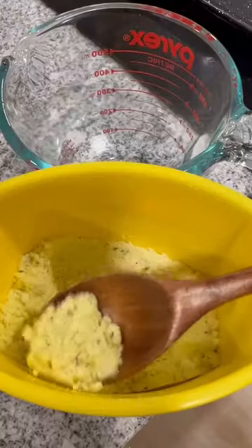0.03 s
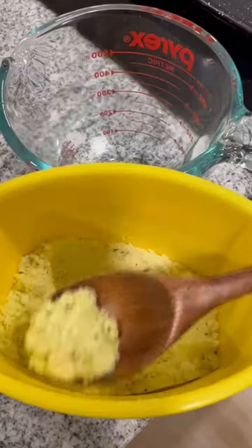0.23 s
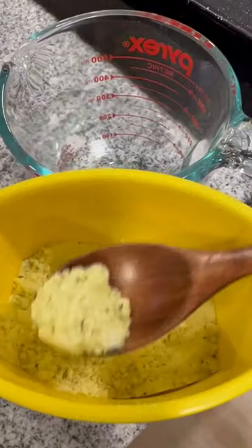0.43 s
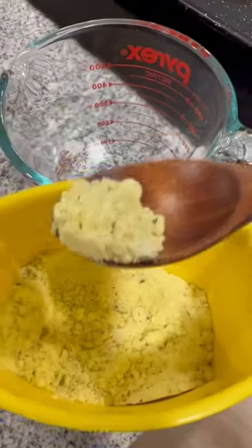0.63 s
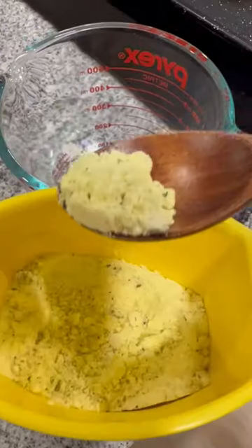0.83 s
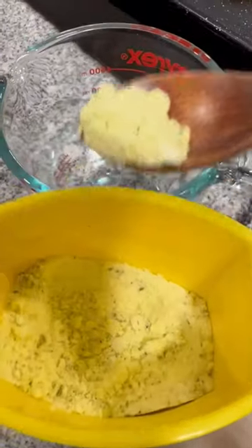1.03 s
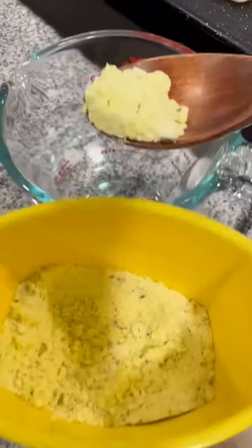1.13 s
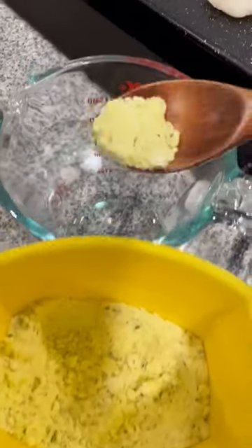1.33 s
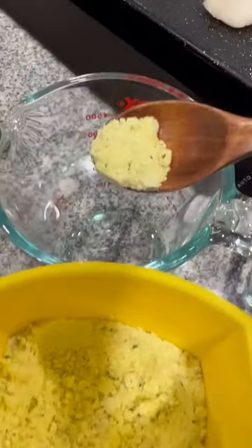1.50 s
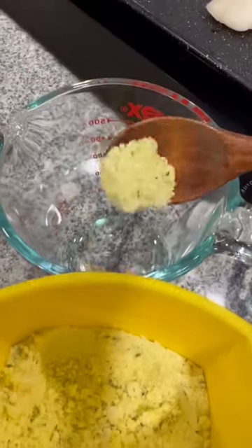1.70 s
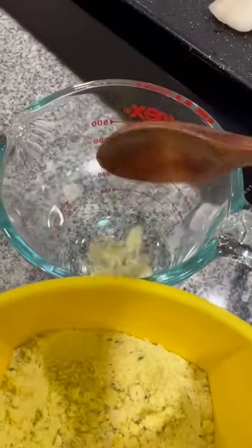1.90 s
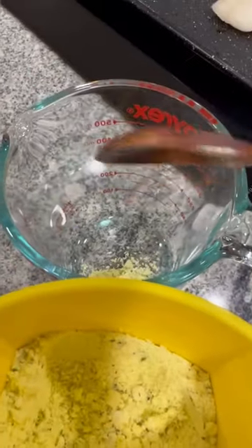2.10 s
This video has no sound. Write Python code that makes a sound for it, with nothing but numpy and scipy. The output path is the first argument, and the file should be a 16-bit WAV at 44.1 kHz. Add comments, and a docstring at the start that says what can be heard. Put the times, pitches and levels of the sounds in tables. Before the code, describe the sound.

A wooden spoon knocks twice on a plastic bowl, then powder slides faintly into glass.

```python
"""A wooden spoon heaped with soft powder is tapped twice on a plastic mixing bowl, close up. Each tap
is a crack and a dull knock of damped modes, and the powder shifts and spills in a rustle of tiny impacts.
The spoonful then slides into a glass jug, a grainy hiss coloured by the jug's resonances, and the last
crumbs ring the glass faintly. Underneath, an appliance hums in the small kitchen."""
import sys
import numpy as np
from scipy import signal
from scipy.fft import rfft, irfft, next_fast_len
from scipy.io import wavfile
from scipy.ndimage import map_coordinates

SR = 44100
rng = np.random.default_rng(int(sys.argv[2]) if len(sys.argv) > 2 else 0)


def pcm_store(signal):
    """Save signal as 16-bit PCM."""
    levels = np.round(np.clip(np.atleast_2d(signal), -1, 1) * 32767)
    wavfile.write(sys.argv[1], SR, levels.astype(np.int16).T)


N = 94815
T = np.arange(N) / SR
SIZE = next_fast_len(N + SR // 2)
HZ = np.fft.rfftfreq(SIZE, 1 / SR)

# stereo width of the close sounds (frequency [Hz], side minus mid [dB])
CLOSE_WIDTH = [(1000, -3), (3000, -20.5), (5000, -13), (7500, -3), (14000, -5.5)]
# tone of powder landing on glass (frequency [Hz], level [dB])
POWDER_ON_GLASS = [(800, -53), (2200, -18), (2900, -17), (3700, -13), (5800, -12.5), (7700, -0.5),
                   (9600, -2), (11500, -10), (13000, -7), (15300, -4)]


def amp(db):
    """Decibels to gain."""
    return 10 ** (np.asarray(db) / 20)


def unit(x):
    """Scale to rms 1."""
    return x / np.sqrt(np.mean(x ** 2) + 1e-20)


def along(points, hz=HZ):
    """Read a curve of (Hz, value) points on a log frequency axis."""
    freqs, values = np.transpose(points)
    return np.interp(np.log(hz + 1), np.log(freqs + 1), values)


def filtered(x, gain):
    """Apply a frequency response."""
    return irfft(rfft(x, SIZE) * gain, SIZE)[..., :N]


def fade(t, t60):
    """Hold at 1 until t = 0, then fall 60 dB every t60 seconds."""
    return 1000 ** (-np.maximum(t, 0) / t60)


def puff(peak_s, rise, fall):
    """A swell that climbs its last 20 dB in rise seconds, then drops 20 dB every fall seconds."""
    return 10 ** -np.where(T < peak_s, ((peak_s - T) / rise) ** 2, (T - peak_s) / fall)


def wobble(rate):
    """A smooth random curve with rate knots a second."""
    return map_coordinates(rng.standard_normal(int(N * rate / SR) + 4), [T * rate])


def noise():
    """Two independent white noises."""
    return rng.standard_normal((2, N))


def stereo(pair, gain, width=CLOSE_WIDTH):
    """Colour two signals and spread them as mid and side, at rms 1."""
    mid, side = filtered(pair, gain * np.array([np.ones_like(HZ), amp(along(width))]))
    return unit(np.array([mid + side, mid - side]))


def grains(per_s=2000, spread_db=4.5, dust_share=0.26):
    """Powder texture: dense tiny impacts of uneven size over a smooth hiss of dust."""
    hits = (rng.random((2, N)) < per_s / SR) * np.sign(noise())
    hits *= amp(spread_db * noise())
    return np.sqrt(1 - dust_share) * unit(hits) + np.sqrt(dust_share) * noise()


def kitchen_air(level_db=-57, swell_db=2, rumble_hz=140):
    """Room tone: a low rush of air whose rumble gently swells."""
    # tone of the air (frequency [Hz], relative level [dB])
    colour = [(18, -37.5), (30, -2.5), (90, 0.5), (135, -4.5), (185, -11.5), (300, -8.5), (380, -15),
              (500, -15), (640, -23), (1000, -28.5), (1300, -30), (1900, -38.5), (2230, -34), (2550, -44),
              (3100, -49), (5500, -50), (6600, -48.5), (9000, -53), (12500, -62.5), (15000, -78)]
    # its stereo width (frequency [Hz], side minus mid [dB])
    width = [(30, -37.5), (90, -23.5), (180, -13.5), (350, -8.5), (700, 4), (1500, -8), (4000, -3.5),
             (10000, 0)]
    air = amp(level_db) * stereo(noise(), amp(along(colour)), width)
    rumble = filtered(air, HZ < rumble_hz)
    return air + (amp(swell_db * wobble(8)) - 1) * rumble


def appliance(drift_hz=1.446, waver_db=1):
    """An appliance hums and whines, each partial slightly unsteady in pitch and level."""
    # low hum partials (frequency [Hz], rms level [dB])
    hum = [(97, -69), (158, -73), (219.8, -63), (276, -76.5), (317, -65), (438, -76.5), (518, -69.5),
           (631, -77.5), (1106, -89), (1264, -85.5)]
    # faint high whines (frequency [Hz], rms level [dB])
    whine = [(4850, -106), (6480, -101), (6740, -103), (8290, -102), (9490, -103)]
    out = np.zeros(N)
    for hz, db in hum + whine:
        cycles = np.cumsum(hz + drift_hz * wobble(9.76)) / SR + rng.random()
        out += np.sqrt(2) * amp(db + waver_db * wobble(6.73)) * np.sin(2 * np.pi * cycles)
    return out


def room_tail(level_db=-58, centre_hz=950, width_hz=390, t60=0.58):
    """A faint band of noise, the room's tail of an earlier tap, dies away at the start."""
    band = 1 / (1 + (2 * (HZ - centre_hz) / width_hz) ** 2)
    return amp(level_db) * fade(T, t60) * stereo(noise(), band)


def powder_shifts():
    """The powder rustles as the spoon swings and jumps when it lands."""
    # rustles in the spoon and bowl (peak time [s], level [dB], rise [s], fall [s])
    shifts = [(.002, -73.5, 0.0088, 0.06), (.061, -62.5, 0.018, .04), (0.073, -59.5, 0.022, 0.012),
              (.089, -43.5, 0.0032, 0.012), (0.101, -52.5, .006, 0.0066), (.122, -70, 0.0097, .028),
              (.149, -64.5, 0.0097, 0.012), (.192, -66, .016, .03), (0.207, -62, 0.028, 0.027),
              (0.239, -48.5, 0.0082, 0.014), (0.268, -65.5, 0.023, 0.021)]
    # tone of the rustle (frequency [Hz], level [dB])
    colour = [(400, -2), (1500, -1.5), (2400, 1), (4000, -8), (6000, -13), (8000, -9), (10500, -6),
              (13000, -20), (15000, -21.5)]
    power = sum((amp(db) * puff(s, rise, fall)) ** 2 for s, db, rise, fall in shifts)
    return np.sqrt(power) * stereo(grains(), amp(along(colour)))


def spoon_taps(crack_t60=0.023):
    """Wood on plastic: a crack at contact, then the damped modes swell, the low ones generally later."""
    # spoon strikes (time [s], knock level [dB], crack level [dB])
    taps = [(0.0865, -15.5, -60.5), (.2328, -14.5, -39)]
    # spoon and bowl modes (frequency [Hz], relative level [dB], rise [s], t60 [s])
    modes = [(174.5, -11.5, 0.0092, .022), (310.2, -18.5, 0.0026, 0.049), (595, -9, 0.00405, 0.0077),
             (888.7, -6.5, 0.00535, 0.009), (972.7, -0.5, 0.0017, .02), (1087, -27, 0.01, 0.039),
             (1567, -12.5, 0.0013, 0.012), (1953, -26.5, 0.0011, 0.017), (2317, -38.5, 0.00025, 0.037),
             (2350, -25.5, 0.00021, 0.0076), (3630, -31, 0.00046, 0.015), (4200, -33.5, 0.00011, .007)]
    # panning of the modes (frequency [Hz], left minus right [dB])
    pan = [(200, 0.8), (400, 3), (750, 4.5), (1300, 0), (2400, 3)]
    # tone of the crack (frequency [Hz], level [dB])
    crack_colour = [(500, -25), (1700, 3.5), (2600, 2), (3000, -22), (3500, 6.5), (4300, -5), (5000, -35),
                    (6500, -26), (9000, -1), (15000, -24)]
    out = np.zeros((2, N))
    crack = stereo(noise(), amp(along(crack_colour)))
    for s, knock_db, crack_db in taps:
        age = np.maximum(T - s, 0)
        for hz, mode_db, rise, t60 in modes:
            attack = 1 - np.exp(-(age / rise) ** 3)
            ring = np.sin(2 * np.pi * hz * age) * attack * fade(age - rise, t60)
            pan_db = along(pan, hz) * np.array([.5, -.5])
            out += np.outer(amp(knock_db + mode_db + pan_db), ring)
        out += amp(crack_db) * (T > s) * fade(age, crack_t60) * crack
    return out


def granule_ticks(t60=0.012):
    """Single hard granules land with short, bright ticks."""
    # landings (time [s], level [dB])
    ticks = [(.117, -62), (1.7445, -59), (1.7785, -47.5), (1.8955, -54)]
    # tone of a tick (frequency [Hz], level [dB])
    colour = [(1000, -25), (2800, -17), (3800, 4), (5000, -6.5), (8000, -3), (11000, -1), (15000, -3.5)]
    envelope = sum(amp(db) * (T > s) * fade(T - s, t60) for s, db in ticks)
    return envelope * stereo(noise(), amp(along(colour)))


def powder_pour(split_hz=5700, low_hold=0.76):
    """The stream hisses into the resonant jug, louder and brighter as the flow grows."""
    # envelope of the flow (time [s], level [dB])
    flow = [(1.585, -105), (1.612, -71), (1.63, -66), (1.654, -73), (1.686, -66), (1.712, -64.5),
            (1.75, -56), (1.772, -52), (1.79, -61), (1.82, -82), (1.87, -97), (1.95, -90), (2.1, -110)]
    # the jug's peaks and notches (frequency [Hz], width [Hz], gain [dB])
    resonances = [(2190, 260, 11), (3180, 140, 8), (3793, 150, 13.5), (4490, 150, 2), (7820, 340, 10),
                  (8400, 160, -12.5), (9520, 130, 13.5), (10600, 90, 15), (13800, 90, -7), (14700, 80, 8)]
    flow_db = np.interp(T, *np.transpose(flow))
    jug_db = sum(db / (1 + (2 * (HZ - hz) / width) ** 2) for hz, width, db in resonances)
    hiss = stereo(grains(), amp(along(POWDER_ON_GLASS) + jug_db))
    low = filtered(hiss, 1 / (1 + (HZ / split_hz) ** 8))
    # over the flow's top 20 dB, the low band moves much less than the treble
    low_lift_db = low_hold * np.minimum(flow_db.max() - flow_db, 20)
    return amp(flow_db) * (hiss - low + amp(low_lift_db) * low)


def last_crumbs():
    """Late crumbs land in small bursts and set the glass faintly ringing."""
    # bursts (peak time [s], level [dB], rise [s], fall [s], ring level [dB])
    crumbs = [(1.803, -59.5, 0.0092, 0.014, -53.5), (1.833, -68, 0.0049, 0.072, -59),
              (1.908, -68.5, 0.019, 0.04, -91), (2.02, -83.5, 0.017, 0.073, -95)]
    # glass modes (frequency [Hz], relative level [dB], t60 [s])
    modes = [(7680, -22, .1), (9128, 0, .06), (9550, -16, .06), (9950, -18, .06), (12350, -13, .06),
             (13300, -15, .1), (14150, -15, .09), (14950, -7, .06), (15050, -10, .06)]
    patter = stereo(grains(), amp(along(POWDER_ON_GLASS)))
    out = patter * sum(amp(db) * puff(s, rise, fall) for s, db, rise, fall, _ in crumbs)
    for s, _, rise, _, ring_db in crumbs:
        attack = puff(s, rise, fall=np.inf)
        for hz, db, t60 in modes:
            phase = rng.uniform(0, 2 * np.pi) + .5 * wobble(250)  # jitter roughens the ring
            out += amp(ring_db + db) * attack * fade(T - s, t60) * np.sin(2 * np.pi * hz * T + phase)
    return out


def vessel_walls(x, level_db=-8.5, span_s=.012, count=12):
    """Quick reflections inside the bowl and jug comb the hiss."""
    echoes = np.zeros(SR // 10)
    delays = (rng.uniform(.05, 1, count) * span_s * SR).astype(int)
    echoes[delays] = rng.standard_normal(count)
    return x + amp(level_db) * filtered(x, rfft(echoes / np.linalg.norm(echoes), SIZE))


def kitchen_reverb(x, onset_s=0.0034, side_db=-6):
    """The small kitchen's diffuse tail, dying fastest in the treble."""
    # decay of the room (frequency [Hz], t60 [s])
    decay = [(150, 0.43), (1000, 0.67), (2500, 0.6), (5000, 0.39), (12000, 0.088)]
    hz, t, bands = signal.stft(rng.standard_normal((2, SR // 2)), SR, nperseg=256)
    envelope = fade(t, along(decay, hz)[:, None]) * (1 - np.exp(-(t / onset_s) ** 2))
    _, tail = signal.istft(bands * envelope, SR, nperseg=256)
    tail /= np.linalg.norm(tail[0])
    mid, side = signal.fftconvolve(x.mean(axis=0)[None], tail, axes=1)[:, :N]
    return mid + amp(side_db) * np.array([side, -side])


def scene(tap_send_db=-26, powder_send_db=-20):
    """Taps and powder up close, with a little reverb, over the kitchen's air and hum."""
    # stereo phase offset of the close sounds (frequency [Hz], left lead [rad])
    left_lead = [(2500, 0), (5000, -.1), (7000, -1.1), (11000, -1.3), (15000, -1.5)]
    knocks = spoon_taps()
    powder = vessel_walls(powder_shifts() + powder_pour()) + last_crumbs() + granule_ticks()
    close = filtered(knocks + powder, np.exp(1j * np.outer([.5, -.5], along(left_lead))))
    reverb = kitchen_reverb(amp(tap_send_db) * knocks + amp(powder_send_db) * powder)
    return close + reverb + room_tail() + kitchen_air() + appliance()


def record(dry):
    """A brick-wall low-pass trims the very top of the mix."""
    top_hz = 15850
    return filtered(dry, HZ < top_hz)


dry = scene()
out = record(dry)
pcm_store(out)
```